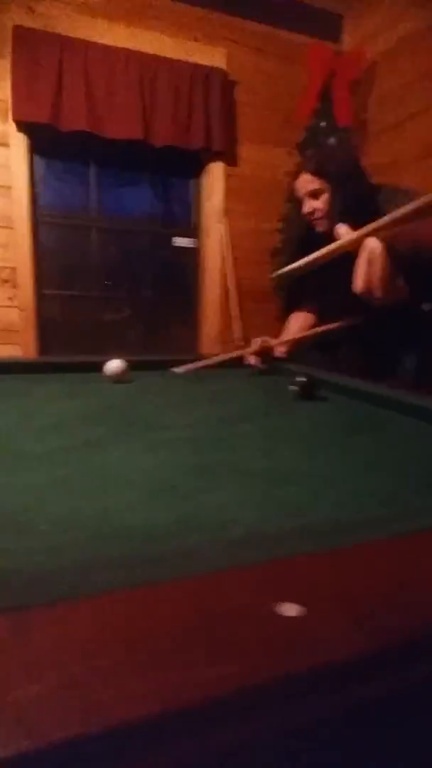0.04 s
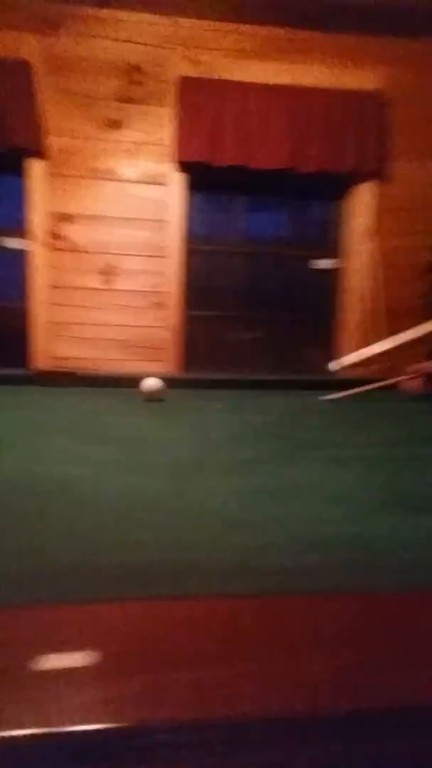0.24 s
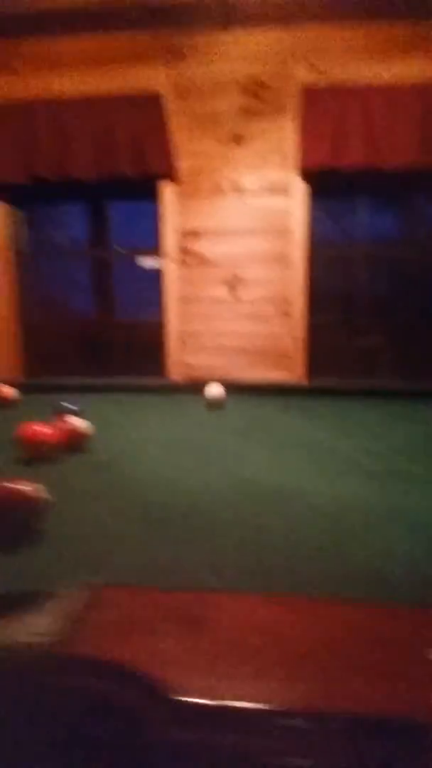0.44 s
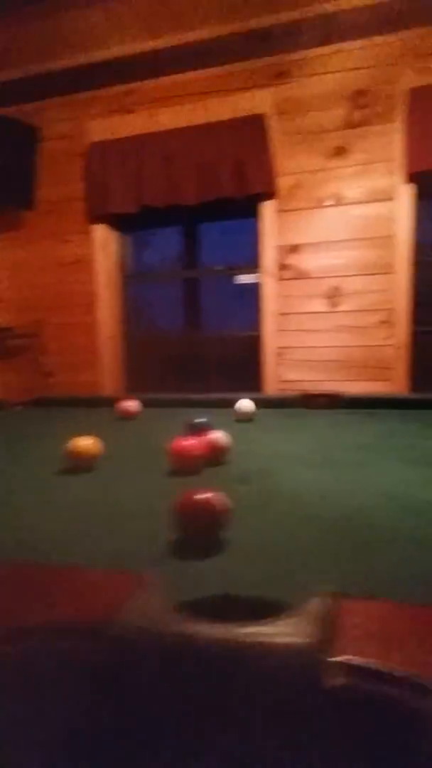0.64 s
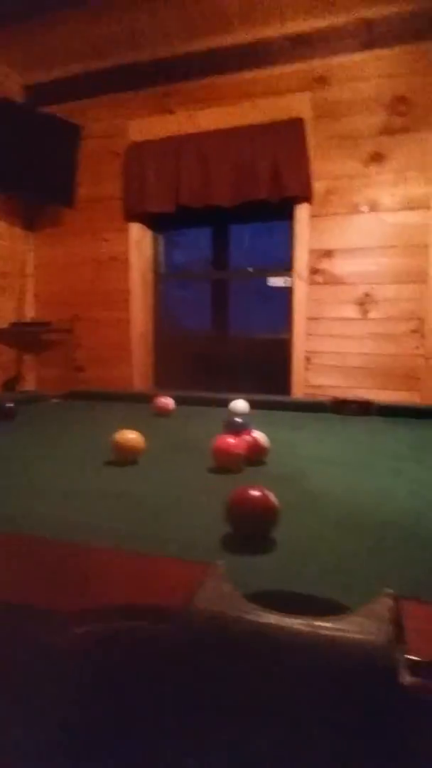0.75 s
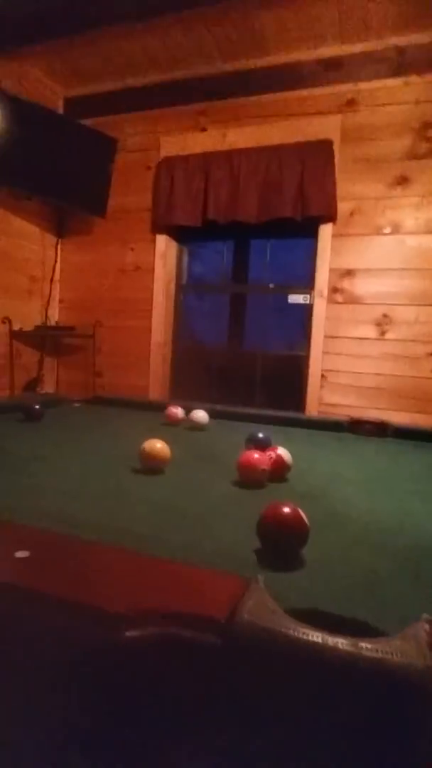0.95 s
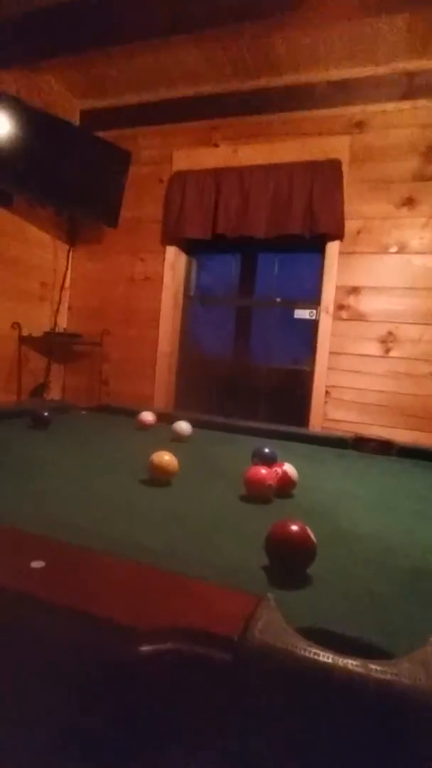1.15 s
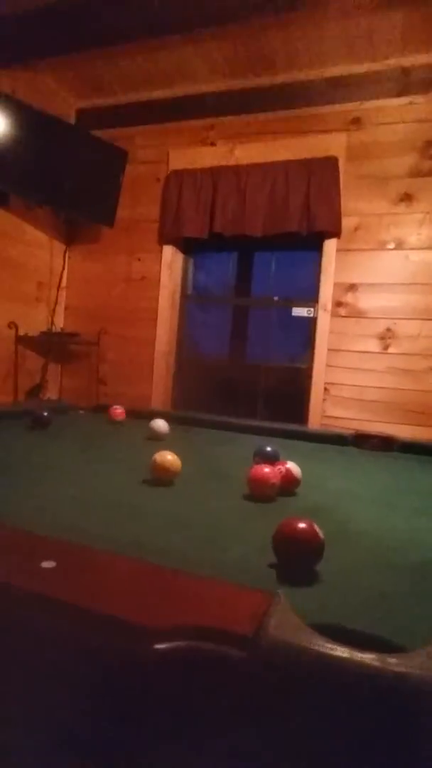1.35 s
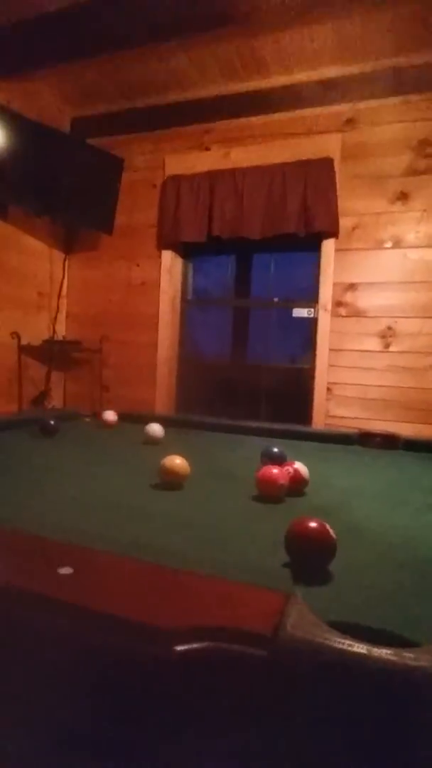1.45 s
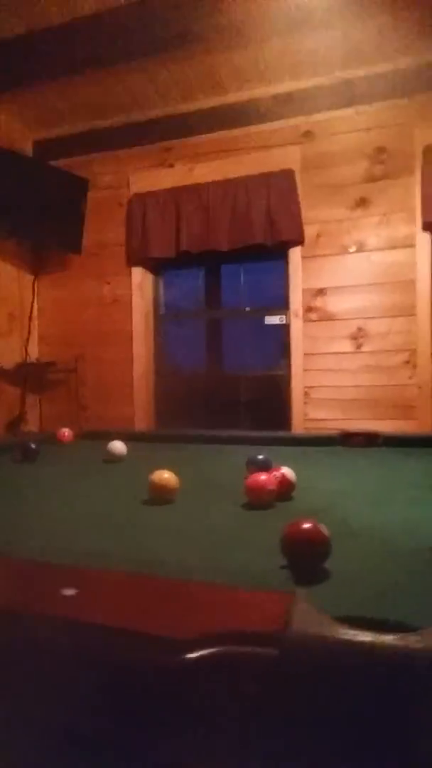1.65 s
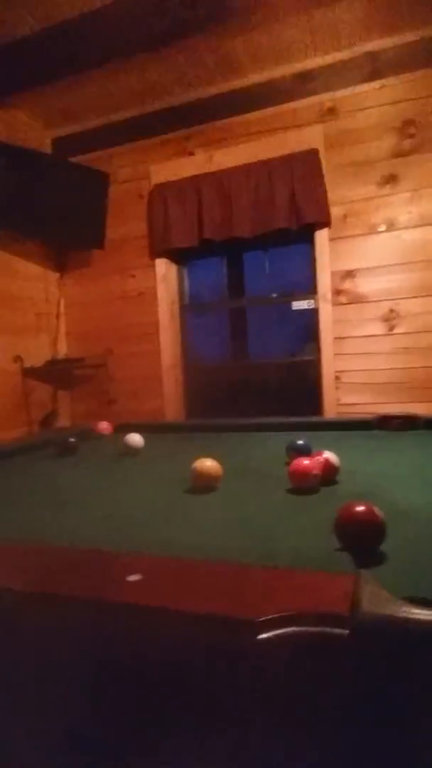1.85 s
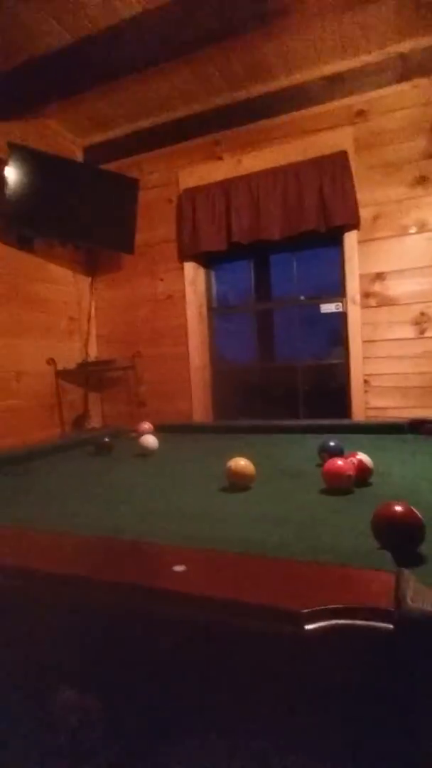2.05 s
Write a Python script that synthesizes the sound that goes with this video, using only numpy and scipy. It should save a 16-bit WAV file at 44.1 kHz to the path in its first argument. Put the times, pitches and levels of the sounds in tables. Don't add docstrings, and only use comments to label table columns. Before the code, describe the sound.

A pool cue knocks a ball with a woody, echoing thud; the ball hops and rolls with a low hum, then clacks sharply against another. A soft cushion thump follows, heard close by phone in a small wooden room.

```python
import sys
import numpy as np
from scipy import signal
from scipy.fft import rfft, irfft
from scipy.io import wavfile
from scipy.ndimage import uniform_filter1d

SR = 44100
rng = np.random.default_rng(int(sys.argv[2]) if len(sys.argv) > 2 else 0)


def dump_mix(stems):
    frames = np.atleast_2d(stems).T
    limited = np.clip(frames, -1, 1)
    pcm = np.round(limited * 32767).astype(np.int16)
    wavfile.write(sys.argv[1], SR, pcm)


def volts_from_db(level):
    exponent = np.asarray(level, float) / 20
    return 10 ** exponent


N = 92169
PAD = 2048
SIDES = np.array([[1], [-1]])
ALIKE_HZ, PORT_LAG_S = 484, 0.00038
LINGER = 1.154
HUM_HZ = 67.4

# start in seconds, level in dB, left-right balance in dB, ring level in dB.
CUE_BLOWS = [
    (.0005, -14, 0.5, -22.5),
    (.056, -16, 1, -17),
]
# start in seconds, level in dB, left-right balance in dB, ring level in dB.
CUSHION_BUMPS = [
    (0.429, -51, 0.021, -52),
    (1.765, -36, 0.51, -25),
]
# start in seconds, level in dB, left-right balance in dB.
CLACK_EVENT = (.9796, -6, 4.2)
# start in seconds, level in dB, left-right balance in dB, frequency in Hz.
CUE_KNOCK = (.00125, -3.5, 1, 510)
# start in seconds, level in dB.
SHAFT_SLIDE = (0.2, -58.5)
# start in seconds, level in dB, ring in Hz, length in cycles, balance in dB.
CASE_TICKS = [(.471, -60, 4800, .4, 8), (1.5837, -32, 5300, .45, -14), (1.58375, -54, 12500, .5, -14),
              (1.5841, -40, 2300, .8, 10), (1.5847, -37, 1250, .5, -18), (1.5855, -39, 700, .45, 2),
              (1.5947, -44, 1500, .35, -12), (1.5981, -38, 1900, .45, -20), (1.5981, -47, 7500, .4, -8),
              (1.5981, -52, 14000, .4, -8), (1.5984, -45, 4600, .9, 8), (1.599, -40, 1100, .55, -6),
              (1.9688, -60, 6400, .8, 20), (1.9737, -59, 6000, .9, 20)]
# time in seconds, slate hum in dB, cloth rumble in dB.
ROLL_LEVELS = [(0.298, -59, -41.5), (.38, -51, -49.5), (0.482, -37, -41), (0.539, -49, -49.5),
               (.62, -43.5, -43), (.75, -40.5, -49), (.84, -48.5, -40), (.93, -49.5, -41.5),
               (1.04, -49, -38), (1.11, -55, -43.5), (1.22, -48, -54), (1.42, -43.5, -51),
               (1.62, -46.5, -47.5), (1.73, -61, -47.5), (1.83, -36, -55), (1.892, -47.5, -52),
               (1.991, -61, -55), (2.09, -57, -50)]
# start in seconds,
# length in seconds, frequency in Hz, level in dB.
NARROW_NOISES = [
    (.125, .05, 14842, -74),
    (.485, .04, 15000, -82),
    (1.96, .02, 6000, -76),
]
# start in seconds, length in seconds, frequency in Hz, level in dB, flutter in radians.
CIRCUIT_WHINE = [(.47, .055, 6310, -75, 1.8), (.525, .165, 6085, -69, 1), (.695, .06, 6200, -72, 9),
                 (.755, .1, 6170, -73, 8), (.95, .028, 6085, -69, 1), (1.245, .065, 6078, -68.5, 1.8),
                 (2.06, .04, 6078, -70, 1.8), (.69, .17, 3747, -79, 1.8)]

# frequency in Hz, level in dB.
CUE_COLOUR = [(60, -16), (200, -6), (450, 0.5), (800, -5.5), (1400, -18), (2500, -28), (7500, -43.5),
              (10000, -64.5)]
# frequency in Hz, level in dB.
HOP_COLOUR = [(60, -17), (200, -4.5), (330, 1.5), (700, -8), (1400, -25), (3000, -51.5), (8000, -74),
              (15000, -102)]
# frequency in Hz, level in dB.
CUSHION_COLOUR = [(60, -8), (125, -5), (320, -13), (700, -22.5), (1400, -33), (5500, -42.5), (9000, -59),
                  (15000, -66)]
# frequency in Hz, level in dB.
SHAFT_COLOUR = [(1300, -29), (1900, -3.5), (2600, -5.5), (3600, -15), (4600, -12.5), (5600, -22.5),
                (9000, -30.5), (11000, -30.5), (16000, -29)]
# frequency in Hz, level in dB.
SLIDE_COLOUR = [(1500, -21), (2500, -5), (3300, 6), (4500, -5), (6200, -5), (7500, -15), (9000, -32)]
# frequency in Hz, level in dB.
CLACK_COLOUR = [(600, -17.5), (1300, -3), (2100, 3.5), (2900, 0), (4000, -9), (5300, -23.5), (6100, -42),
                (20000, -89.5)]
# frequency in Hz, level in dB.
SIZZLE_COLOUR = [(3000, -17), (5500, -0.5), (7600, 2), (9000, -16.5), (11000, -4), (14500, -5),
                 (16000, -14)]
# frequency in Hz, level in dB.
SLATE_COLOUR = [(29, -38.5), (50, -13), (140, 3), (259, -2.5), (391, -18.5), (827, -19), (900, -12.5),
                (1170, -50.5), (1980, -120)]
# frequency in Hz, boost in dB.
LEFT_PORT_COLOUR = [(5000, 0.5), (9000, 0.5)]
# frequency in Hz, level in dB per Hz.
AIR_COLOUR = [(40, -32.5), (100, -5.5), (200, -18.5), (450, -22), (1400, -39), (4000, -47.5), (6300, -48),
              (9000, -58.5)]

# frequency in Hz, time to fall 60 dB in seconds.
ROOM_DECAY = [(60, 0.9), (130, 0.93), (250, 0.51), (600, 0.48), (1800, 0.38), (4500, 0.32), (7500, 0.35),
              (12000, 0.14)]
# frequency in Hz, width in Hz, level in dB.
TABLE_MODES = [(125.05, 7.3, 1.5), (172.2, 35, -7.5), (215.9, 10, -6.5), (252, 34, -5), (329, 50, -14),
               (508.5, 88, -11)]
# frequency in Hz, level in dB, time to fall 60 dB in seconds.
STICK_MODES = [(127, -8.5, 0.58), (199.7, -6, 0.29), (337.5, -10.5, 0.21), (449.7, 1.5, 0.44),
               (690, -2, 0.46), (706, -5.5, .5), (943, -12, 0.57), (1035, -13, 0.38), (1170, -9.5, 0.43),
               (1830, -6, 0.35), (1908, -15.5, 0.36), (2740, -24, 0.31), (3300, -46, 0.26),
               (4570, -52.5, 0.19)]
# frequency in Hz, level in dB, time to fall 60 dB in seconds.
HOP_MODES = [(202.7, -2, 0.47), (326, -5, 0.11), (396.2, -3.5, 0.42), (456, -6, 0.33), (581.3, -6, 0.25),
             (675.6, -11, 0.23)]
# frequency in Hz, level in dB, time to fall 60 dB in seconds.
RAIL_MODES = [(66.6, -11.5, 0.559), (121.66, 6.5, 0.189), (216, -27.5, 0.21), (332.35, -14.5, 0.379),
              (466, -21, 0.26), (628, -20, 0.328)]
# frequency in Hz, level in dB, time to fall 60 dB in seconds.
SLATE_MODES = [(113, 3.5, 0.18), (166, 2, 0.3), (241, -1.5, 0.27), (333.2, -7, 0.4)]
# frequency in Hz, level in dB, time to fall 60 dB in seconds.
PANEL_MODES = [(1669, -12.5, 0.46), (1897, -35, 6.2), (1967, -4, 0.33), (2174, -10.5, 0.57),
               (2200, -4, 0.3), (2500, -8.5, 0.47), (2463, -0.5, 0.26), (2454, -0.5, 0.17),
               (2606, 2.5, 0.21), (3000, -14.5, 0.46), (3170, -3, 0.07), (3935, -18.5, 0.43)]


def read(points, hz):
    p = np.array(points, float)
    return np.interp(np.log(np.maximum(hz, 1)), np.log(p[:, 0]), p[:, 1])


def tint(x, points):
    n = x.shape[-1]
    hz = np.arange(n // 2 + 1) * SR / n
    return irfft(rfft(x) * volts_from_db(read(points, hz)), n)


def unit(x):
    return x / np.sqrt(np.mean(x ** 2))


def ring(x, hz, width):
    return signal.lfilter(*signal.iirpeak(hz, hz / width, fs=SR), x)


def walk(rate):
    k = int(SR / rate)
    held = np.repeat(rng.standard_normal(N // k + 1), k)
    return 1.37 * uniform_filter1d(uniform_filter1d(held, k), k)[:N]


def gate(t, s, length, fade_s):
    return np.clip(np.minimum(t - s, s + length - t) / fade_s, 0, 1)


def wide(n):
    mid, side = rfft(rng.standard_normal((2, n)))
    hz = np.arange(n // 2 + 1) * SR / n
    share = 0.31 + 0.71 * hz ** 2 / (hz ** 2 + ALIKE_HZ ** 2)
    lag = np.exp(1j * np.pi * hz * SIDES * PORT_LAG_S / (1 + (hz / ALIKE_HZ) ** 2))
    both = mid * lag * np.sqrt(2 - share ** 2) + SIDES * side * share
    return irfft(both, n) / np.sqrt(2)


def swing(t, hz, cycles, tail):
    spread = cycles * np.where(t > 0, tail, 1)
    return -np.cos(2 * np.pi * hz * t) * np.exp(-(t * hz / spread) ** 2 / 2)


def rings(modes, rise_s, rough_db=3):
    t, longest_t60_s = np.arange(32768) / SR, .7
    out = 0
    for (hz, db, t60), (phase, place) in zip(modes, rng.random((len(modes), 2))):
        lean = SIDES * (place - .5) * min(hz / 500, 2.5) + hz / 2200 * walk(45)[:len(t)]
        level = db - 60 * t / min(t60, longest_t60_s) + rough_db * walk(26)[:len(t)]
        out = out + volts_from_db(level) * np.sin(2 * np.pi * (hz * t + phase) + lean)
    return out * (1 - np.exp(-t / rise_s)) * np.clip((t[-1] - t) * 10, 0, 1)


def room(tone, linger=1, n=32768):
    t, hz = np.arange(n) / SR, np.arange(n // 2 + 1) * SR / n
    sparse_db, sparse_s, fill_s, rise_s = 3.5, 0.048, 0.0029, 0.0035
    grain = uniform_filter1d(rng.standard_normal(n), size=30) * np.sqrt(30)
    lumps = volts_from_db(sparse_db * np.exp(-t / sparse_s) * grain)
    spec, out = rfft(unit(tint(wide(n) * lumps, tone))), 0
    for step in range(19):
        centre = 40 * np.sqrt(2) ** step
        band = np.clip(1 - np.abs(2 * np.log2(np.maximum(hz, 1) / centre)), 0, 1)
        fall = -60 * t / read(ROOM_DECAY, centre) / (linger if centre > 1500 else 1)
        out = out + irfft(spec * band, n) * volts_from_db(fall)
    out = out * (1 - 0.37 * np.exp(-t / fill_s))
    rise = np.sin(np.pi / 2 * np.clip(t / rise_s, 0, 1)) ** 2
    return out * rise * np.clip((t[-1] - t) * 10, 0, 1)


def slow_fill(echoes, gap, fill_s):
    t = np.arange(echoes.shape[1]) / SR
    return echoes * (1 - gap * np.exp(-(t / fill_s) ** 2))


def add(out, s, sound, db, pan_db):
    i = int(s * SR) + PAD
    n = min(sound.shape[-1], out.shape[1] - i)
    out[:, i:i + n] += sound[..., :n] * volts_from_db(db + SIDES * pan_db / 2)


def air():
    air_db, hiss_db = -60.5, -72.5
    noise = tint(wide(N), AIR_COLOUR)
    top = signal.sosfilt(signal.butter(4, 300, "high", fs=SR, output="sos"), noise)
    out = noise * volts_from_db(air_db + 2 + 0.36 * walk(5.8)) / np.sqrt(np.mean(top ** 2))
    out = out - .9 * ring(out, HUM_HZ, 34)
    return out + volts_from_db(hiss_db) * rng.standard_normal((2, N))


def whine(t):
    out = np.zeros((2, N))
    for s, length, hz, db, flutter in CIRCUIT_WHINE:
        level = gate(t, s, length, 0.0033) * (SIDES > 0) * volts_from_db(db + 1.5 + 2 * walk(30))
        out = out + level * np.sin(2 * np.pi * hz * t + flutter * walk(35))
    return out


def squeaks(t):
    out = np.zeros((2, N))
    for s, length, hz, db in NARROW_NOISES:
        narrow = unit(ring(ring(wide(N), hz, 250), hz, 500))
        out = out + gate(t, s, length, 0.019) * volts_from_db(db) * narrow
    return out


def ticks(out):
    t = np.arange(-256, 768) / SR
    grit_db, grit_t60_s = -17.5, 0.011
    for s, db, hz, cycles, pan_db in CASE_TICKS:
        grit = unit(ring(rng.standard_normal((2, len(t))), hz, hz / 2))
        grit = grit * volts_from_db(grit_db - 60 * t / grit_t60_s) * (t > 0)
        tick = swing(t, hz, cycles, 2.1) + grit
        tick[0] = np.roll(tick[0], 12)
        add(out, s - 256 / SR, tick, db, pan_db)


def rolling(t):
    s, hum_db, rumble_db = np.array(ROLL_LEVELS).T
    wander = 0.031
    turns = np.cumsum(HUM_HZ * (1 + wander * walk(13))) / SR
    hum = np.sin(2 * np.pi * turns) * np.sqrt(2)
    rumble = 0
    for hz, width, db in TABLE_MODES:
        level = volts_from_db(db + 2 * walk(8.86))
        rumble = rumble + level * unit(ring(ring(wide(N), hz, width), hz, 3 * width))
    hum = hum * volts_from_db(np.interp(t, s, hum_db) + SIDES * .1)
    return hum + unit(rumble) * volts_from_db(np.interp(t, s, rumble_db))


def cushion(out):
    fill_s = .014
    for s, db, pan_db, ring_db in CUSHION_BUMPS:
        add(out, s, slow_fill(room(CUSHION_COLOUR), .7, fill_s), db, pan_db)
        add(out, s + fill_s / 2, rings(RAIL_MODES, .03), ring_db, 0)


def cue(out):
    bodies = (CUE_COLOUR, STICK_MODES, .002), (HOP_COLOUR, HOP_MODES, .008)
    for (s, db, pan_db, ring_db), (tone, modes, rise_s) in zip(CUE_BLOWS, bodies):
        add(out, s, room(tone, LINGER), db, pan_db)
        add(out, s, rings(modes, rise_s), ring_db, 0)
    s, db, pan_db, hz = CUE_KNOCK
    knock = -swing(np.arange(-256, 256) / SR, hz, 1.0, .6)
    both = np.array([knock, np.roll(knock, 10)])
    add(out, s - 256 / SR, both, db, pan_db)
    add(out, -.004, room(SHAFT_COLOUR, LINGER), -32, 0)
    s, db = SHAFT_SLIDE
    add(out, s, room(SLIDE_COLOUR, LINGER), db, 0)


def clack(out):
    s, db, pan_db = CLACK_EVENT
    t = np.arange(-128, 128) / SR
    pulse = swing(t, 2642, 0.35, 1.9)
    pulse = pulse + volts_from_db(-44) * swing(t, 7300, 1.5, 1) + volts_from_db(-52) * swing(t, 14500, 1.5, 1)
    hump = np.hanning(256)
    pulse = pulse - pulse.sum() * hump / hump.sum()
    start = s - 128 / SR
    add(out, start, pulse, db, pan_db)
    add(out, start - .0023, pulse, db - 38, 0)
    add(out, s, slow_fill(room(CLACK_COLOUR), 0.4, 0.009), -16.5, .5)
    add(out, s, room(SIZZLE_COLOUR, 1.5), -58.5, 3.5)
    add(out, s, rings(PANEL_MODES, .008), -31, 0)
    add(out, s, room(SLATE_COLOUR), -33.5, 0)
    add(out, s, rings(SLATE_MODES, 0.0068), -32.5, 0)


def scene():
    t, out = np.arange(N) / SR, np.zeros((2, 2 ** 17))
    clack(out)
    cue(out)
    cushion(out)
    out = np.array([tint(out[0], LEFT_PORT_COLOUR), out[1]])
    ticks(out)
    return out[:, PAD:PAD + N] + rolling(t) + air() + squeaks(t) + whine(t)


def low_pass(x):
    return signal.sosfilt(signal.butter(12, 15830, fs=SR, output="sos"), x)


def record(dry):
    dry = signal.sosfilt(signal.butter(5, 54, "high", fs=SR, output="sos"), dry)
    hand = volts_from_db(-66.5) * unit(ring(wide(N), 28, 44))
    return low_pass(dry + hand)


dry = scene()
out = record(dry)
dump_mix(out)
```